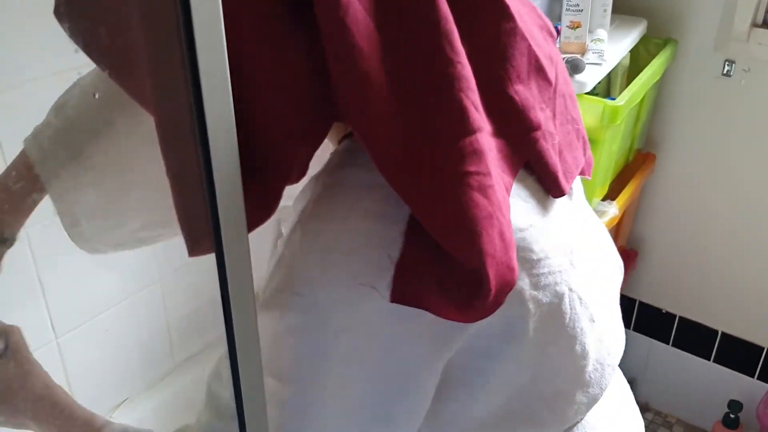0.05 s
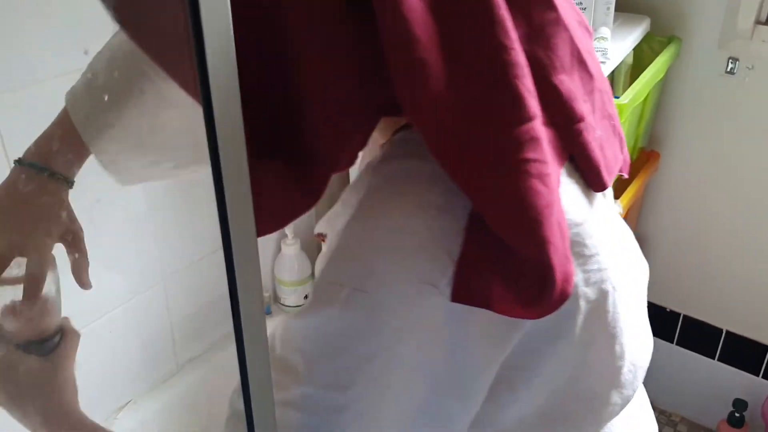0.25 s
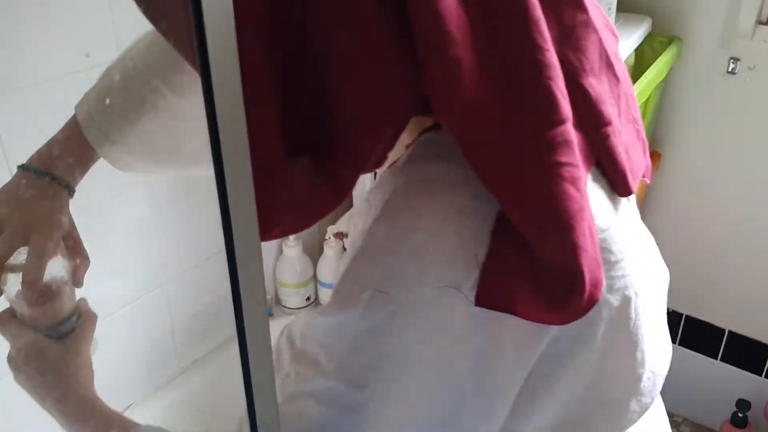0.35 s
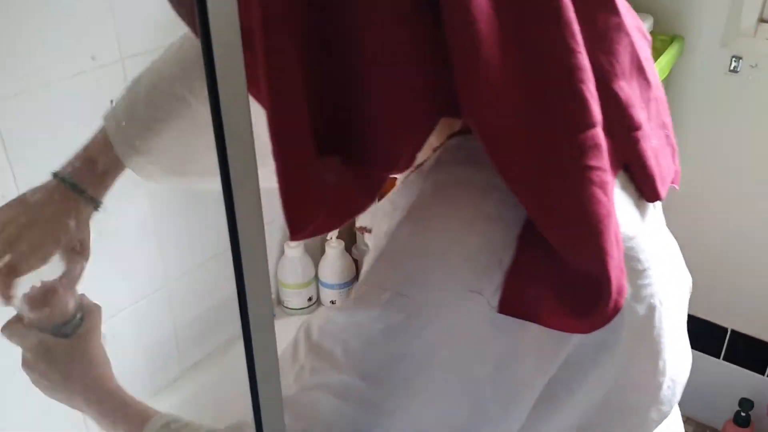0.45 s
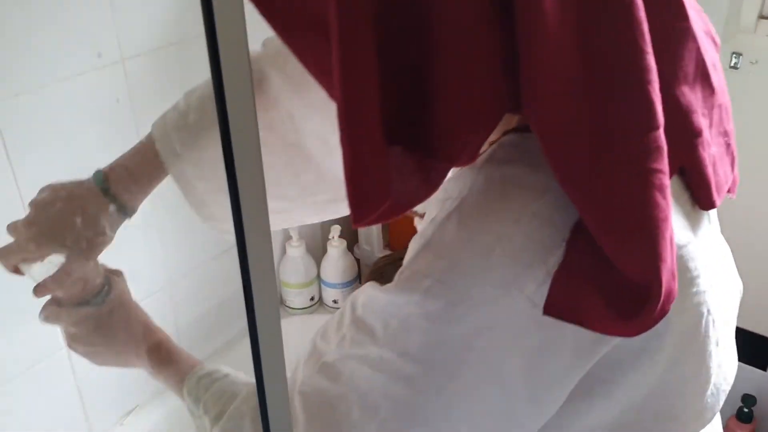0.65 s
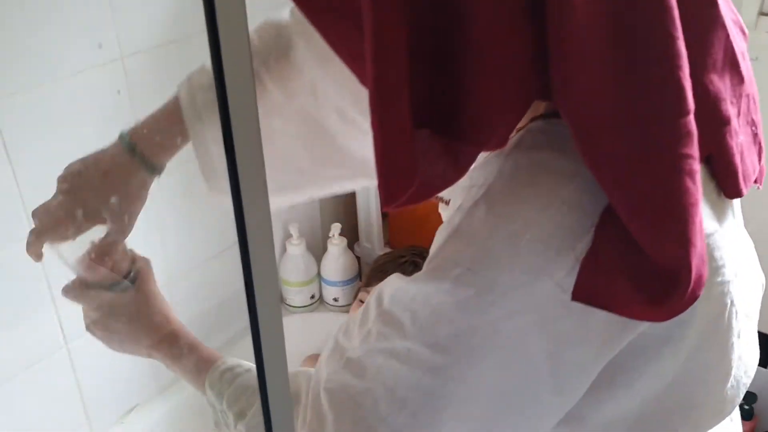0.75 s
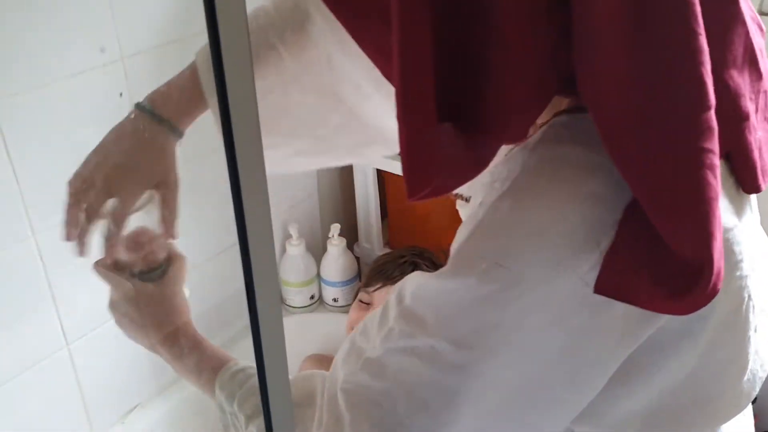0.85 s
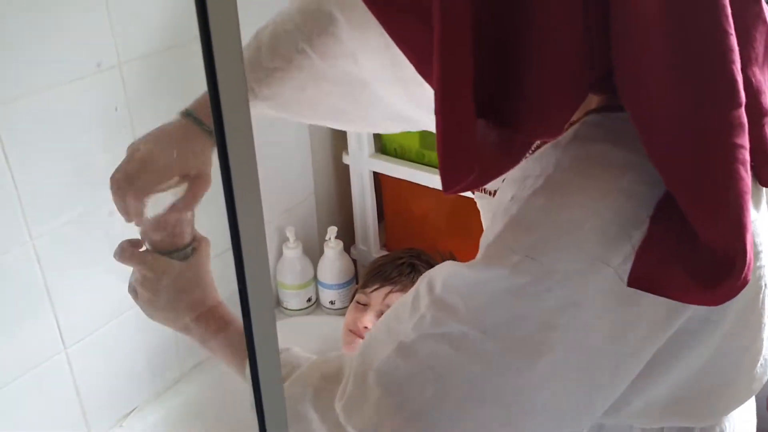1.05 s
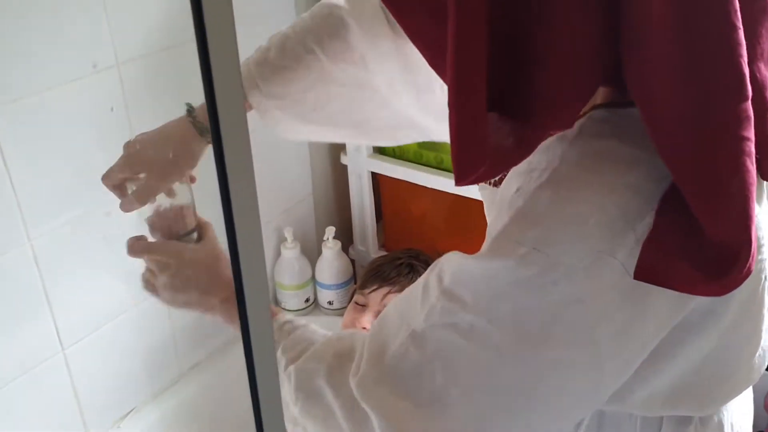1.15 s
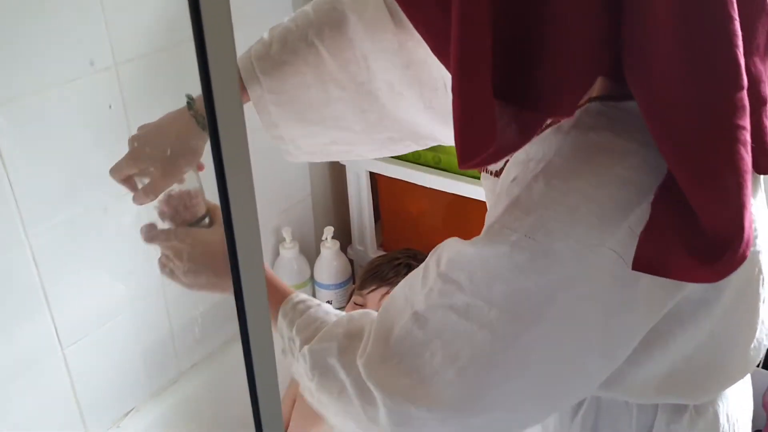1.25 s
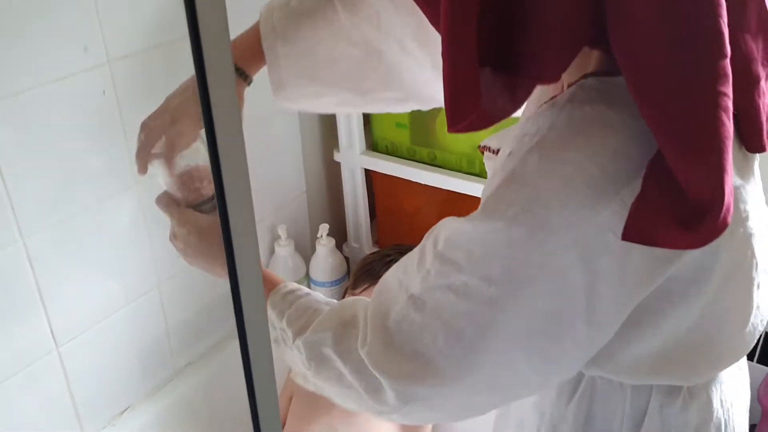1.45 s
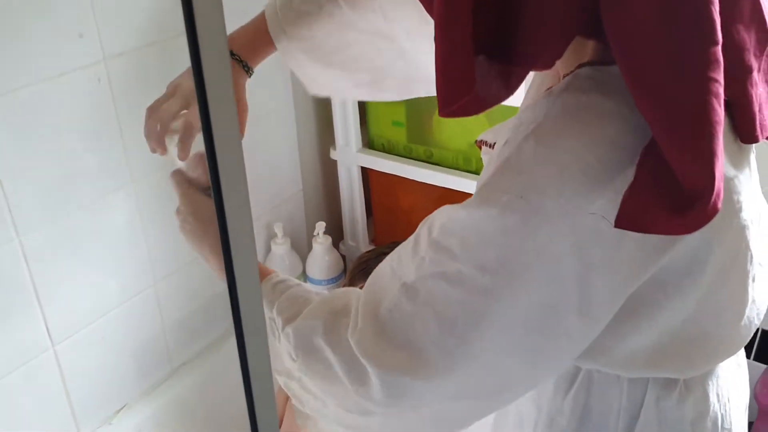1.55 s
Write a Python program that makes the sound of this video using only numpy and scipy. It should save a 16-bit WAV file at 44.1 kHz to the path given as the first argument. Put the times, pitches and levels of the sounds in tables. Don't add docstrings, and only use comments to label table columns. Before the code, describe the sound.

Two quick rattly swishes of salt sliding inside a small container, soft thuds and a knock between

```python
import sys
import numpy as np
from scipy import signal
from scipy.fft import rfft, irfft
from scipy.io import wavfile
from scipy.ndimage import uniform_filter1d

SR = 44100
rng = np.random.default_rng(int(sys.argv[2]) if len(sys.argv) > 2 else 0)


def master(y):
    cut = np.clip(np.atleast_2d(y).T, -1, 1)
    pcm = np.round(cut * 32767)
    wavfile.write(sys.argv[1], SR, pcm.astype(np.int16))


def undo_db(level):
    steps = np.asarray(level, float) / 20
    return 10 ** steps


N = 70560


def evened(x):
    return x / np.sqrt(np.mean(x ** 2) + 1e-20)


def read(points, hz):
    f, value = np.transpose(points)
    return np.interp(np.log(hz + 1), np.log(f + 1), value)


def level(points):
    return undo_db(np.interp(np.arange(N) / SR, *np.transpose(points)[:2]))


def add(mix, s, sound):
    part = mix[round(s * SR):][:len(sound)]
    part += sound[:len(part)]


def resonate(x, hz, width):
    turn = np.exp(2j * np.pi * np.cumsum(hz * np.ones(N)) / SR)
    r = np.exp(-np.pi * width / SR)
    return 2 * (turn * signal.lfilter([1 - r], [1, -r], x / turn + 1e-18)).real


def narrow_noise(noise, hz, width):
    return evened(resonate(resonate(noise, hz, width), hz, width))


def colour(x, points):
    return irfft(rfft(x) * undo_db(read(points, np.fft.rfftfreq(N, 1 / SR))), N)


# (frequency [Hz], coherence [0 to 1])
COHERENCE = [(60, 0.88), (300, 0.76), (1000, 0.016)]


def hiss(points, patchy_db):
    frames, hz = N // 256 + 5, np.fft.rfftfreq(1024, 1 / SR)
    a, b, c, d, patches = rng.standard_normal((frames, 513, 5)).T
    patches = uniform_filter1d(patches, size=14, axis=0)
    patches = evened(uniform_filter1d(patches, size=12, axis=1))
    same = np.clip(read(COHERENCE, hz), -1, 1)[:, None]
    left, other = a + 1j * b, c + 1j * d
    z = np.array([left, same * left + np.sqrt(1 - same ** 2) * other])
    z = z * undo_db(read(points, hz)[:, None] + patchy_db * patches)
    return evened(signal.istft(z, nperseg=1024, noverlap=768)[1][:, :N])


# (frequency [Hz], density [dB per Hz])
AIR = [(300, -11), (600, 7.5), (1500, 4.5), (3000, 3.5), (6500, 9.5), (8000, -3.5), (12000, -8),
       (15500, -1)]
# (frequency [Hz], density [dB per Hz])
CLOTH = [(450, -6), (750, -2), (1000, -3.5), (1500, -5.5), (2600, 1.5), (4000, -3.5), (6500, -7),
         (9700, -20.5), (12500, -24)]
# (time [s], level [dB])
RUSTLE = [(0, -59), (.1, -71.5), (.25, -82), (.265, -69), (.31, -72), (.38, -91), (.6, -59.5), (.8, -72.5),
          (.9, -79.5), (1.05, -101), (1.3, -66.5), (1.4, -67), (1.55, -67.5), (1.6, -64)]
# (frequency [Hz], density [dB per Hz])
SILK_COLOUR = [(5000, -15), (7000, 16), (12500, 9.5), (15600, -22)]
# (time [s], level [dB])
SILK = [(0, -80), (.1, -87.5), (1.33, -90.5), (1.4, -73.5), (1.6, -72.5)]
# (time [s], level [dB])
PIPE_MOAN = [(0, -62.5), (.2, -71), (.26, -89), (1.2, -86), (1.3, -66.5), (1.38, -82)]
# (frequency [Hz], density [dB per Hz])
RUMBLE = [(15, -33), (30, 5.5), (100, 4.5), (250, 0), (420, -14), (600, -14), (1000, -36.5)]
# (time [s], level [dB])
HANDLING = [(0, -73.5), (.1, -67.5), (.19, -68.5), (.26, -56), (.45, -65), (.6, -61), (.75, -60),
            (.85, -67.5), (.97, -71), (1.1, -66.5), (1.19, -65), (1.26, -68), (1.4, -68), (1.47, -75),
            (1.6, -73)]


def background():
    air = undo_db(-75.5) * hiss(AIR, patchy_db=1.2)
    cloth = level(RUSTLE) * hiss(CLOTH, patchy_db=1.2)
    silk = level(SILK) * hiss(SILK_COLOUR, patchy_db=1.2)
    rumble = level(HANDLING) * hiss(RUMBLE, patchy_db=1.0)
    noise = rng.standard_normal(N) + 0.52 * rng.standard_normal((2, N))
    moan = level(PIPE_MOAN) * narrow_noise(noise, hz=399.5, width=86)
    return air + cloth + silk + rumble + moan


# (start [s], rise [s], fall [s], level [dB], pitch [Hz])
THUDS = [(0.222, 0.024, 0.13, -38.5, 58), (0.275, 0.013, 0.048, -43.5, 65.5),
         (0.325, 0.012, 0.14, -57, 58.7), (0.44, 0.012, 0.19, -58, 42), (0.46, 0.05, 0.14, -57.5, 35.6),
         (0.29, 0.023, 0.19, -54.5, 36.6), (0.23, 0.014, 0.065, -56.5, 255), (0.27, 0.02, .04, -61.5, 410),
         (.25, 0.0097, 0.029, -61.5, 505), (.25, 0.015, 0.036, -55.5, 177), (0.28, 0.012, 0.023, -63, 244),
         (0.46, 0.013, 0.03, -65.5, 238), (1.09, 0.037, 0.14, -57, 65), (.855, 0.014, 0.043, -63.5, 270),
         (.43, 0.022, 0.092, -58.5, 98), (.626, 0.0018, 0.028, -49.5, 186), (1.13, 0.014, 0.084, -62, 180),
         (.55, 0.012, 0.047, -62, 310), (.341, .02, .12, -55, 61), (.626, 0.0035, 0.026, -48, 370.7),
         (0.64, 0.013, 0.13, -48, 60), (0.646, 0.014, 0.027, -43.5, 157), (0.67, 0.0067, 0.039, -49.5, 409),
         (.739, 0.0045, 0.023, -49, 304), (0.858, 0.013, 0.036, -56.5, 82), (0.993, 0.032, 0.1, -51.5, 67),
         (1.14, 0.006, 0.11, -57, 388), (1.125, 0.017, 0.032, -49, 287), (1.148, 0.014, 0.02, -38, 291),
         (1.175, 0.012, 0.024, -46, 290), (1.148, 0.0082, 0.14, -58.5, 96), (1.217, 0.01, 0.053, -59, 308)]


def thuds():
    out = np.zeros(N)
    for start, rise, fall, db, hz in THUDS:
        t = np.arange(0, rise + fall, 1 / SR)
        ramp = np.clip(np.minimum(t / rise, (rise + fall - t) / fall), 0, 1)
        shape = np.sin(np.pi / 2 * ramp) ** 2
        add(out, start, -undo_db(db) * shape * np.sin(2 * np.pi * hz * t))
    return out * undo_db([[1.2], [-1.2]])


# (frequency [Hz], decay time T60 [s])
ROOM = [(200, 0.25), (1000, 0.29), (3000, 0.21), (8000, 0.18), (15000, 0.1)]


def room(x):
    taps = np.zeros((2, SR // 2))
    at = np.arange(100, SR // 2 - 10, 10) + rng.integers(0, 10, (2, (SR // 2 - 101) // 10))
    np.put_along_axis(taps, at, rng.choice([-1., 1.], at.shape), 1)
    hz, t, z = signal.stft(taps, SR, nperseg=256)
    t60 = np.maximum(read(ROOM, hz), .03)[:, None]
    tail = signal.istft(z * undo_db(-60 * t / t60), SR, nperseg=256)[1]
    return signal.fftconvolve(x, tail / np.linalg.norm(tail[0]), axes=1)[:, :N]


# (time [s], level [dB], brightness [dB])
KNOCKS = [(.238, -53, -14.5), (0.26, -47.5, -5), (.628, -35.5, -2), (.641, -46.5, -0.5), (.655, -74, 1),
          (.666, -48.5, -28), (.68, -56, -25), (0.695, -55, -10), (0.712, -52, -33), (0.74, -54, 6),
          (0.752, -62, -29), (0.769, -57.5, -36), (.79, -55.5, -26)]
# (frequency [Hz], level [dB], decay time T60 [s])
TUB = [(76, 1.5, 0.054), (154, -5, 0.018), (232, -18, 0.043), (309.6, 5, 0.042), (363.7, 6, 0.054),
       (404.6, -12, 0.09)]
# (frequency [Hz], density [dB per Hz])
RIM = [(80, -28), (200, 6), (450, -3), (600, 0.5), (1400, -5.5), (2000, -12), (2700, -14), (3500, -39)]


def knocks():
    rim_t60_s = 0.12
    crack_db, crack_s = 2.5, 0.0029
    mode_scatter = .03
    out, puff, t = np.zeros(N), np.zeros(N), np.arange(8000) / SR
    spread = rng.standard_normal((len(KNOCKS), 14))
    for (s, db, bright_db), vary in zip(KNOCKS, spread):
        ring = 0
        for (hz, mode_db, t60), v, w in zip(TUB, vary, vary[7:]):
            decay = undo_db(mode_db + 2 * v - 60 * t / t60)
            ring = ring + decay * np.sin(2 * np.pi * hz * (1 + mode_scatter * w) * t)
        add(out, s, undo_db(db - 5.5) * np.minimum(t / 0.0036, 1) * ring)
        scrape_db = db + bright_db - 7 - 60 * t / rim_t60_s + crack_db * np.exp(-t / crack_s)
        add(puff, s, undo_db(scrape_db) * np.minimum(t / 0.00096, 1))
    friction = rng.standard_normal(N) + .8 * rng.standard_normal((2, N))
    both = out + puff * evened(colour(friction, RIM))
    return both + undo_db(-4) * room(both)


# (start [s], length [s], level [dB], upper whine [dB])
LENS = [(.275, .095, -81, -7), (.78, .09, -84, -12), (.94, .085, -79, -5), (1.5, .1, -83, -15)]


def lens():
    t, out = np.arange(N) / SR, np.zeros((2, N))
    noise = rng.standard_normal((2, N))
    whine = narrow_noise(noise, hz=9780, width=330)
    upper = narrow_noise(noise, hz=13770, width=330)
    motor_hiss = undo_db(5) * evened(resonate(noise[::-1], 7500, 3400))
    for start, length, db, upper_db in LENS:
        gate = np.clip(np.minimum((t - start) / 0.0047, (start + length - t) / 0.034), 0, 1)
        out += undo_db(db) * gate * (whine + motor_hiss + undo_db(upper_db) * upper)
    return out


# (time [s], surge [dB])
LUMPS = [(0.409, 2), (.434, 1), (0.446, 6.5), (.458, 7), (0.472, -4), (.479, 3.5), (0.486, 6.5),
         (0.499, -4), (0.502, 5), (0.509, 5.5), (.514, 4), (0.531, 12), (0.543, 8), (0.554, 7),
         (1.036, 0.5), (1.048, 3), (1.056, 11), (1.068, 2), (1.090, 6.5), (1.095, 7), (1.104, 10),
         (1.109, 4.5), (1.117, 11.5), (1.129, 5), (1.133, 2), (1.146, 3.5), (1.156, 15), (1.163, 6.5),
         (1.171, -3)]


def lumps():
    rise_s, fall_s = 0.00083, 0.0031
    surge_db, t = np.zeros(N), np.arange(1500) / SR
    for s, db in LUMPS:
        add(surge_db, s, db * np.minimum(t / rise_s, 1) * np.exp(-t / fall_s))
    return undo_db(surge_db)


def grains():
    grains_per_s, spread_db = 12000, 2.5
    clump_db, clump_s = .6, 0.0093
    clumps = evened(uniform_filter1d(rng.standard_normal(N), round(clump_s * SR)))
    struck = rng.random((2, N)) < grains_per_s / SR
    sign = np.sign(rng.standard_normal((2, N)))
    size = np.minimum(rng.exponential(1, (2, N)), 5)
    return struck * sign * undo_db(spread_db * size + clump_db * clumps)


# (frequency [Hz], width [Hz], level [dB])
SHELL = [(2110, 36, -11), (2395, 90, -16), (2549, 12, -6.5), (2780, 48, -12), (2937, 8.7, -5)]


def container(ticks, cavity_hz):
    extra_width_hz = 30
    cavity = undo_db(13) * 2 * resonate(ticks, cavity_hz, width=210)
    wall = undo_db(8) * 2 * resonate(ticks, 2095, width=180)
    rung = evened(ticks + cavity + wall)
    for hz, width, db in SHELL:
        rung = rung + undo_db(db) * evened(resonate(ticks, hz, extra_width_hz + width))
    return rung


# (time [s], level [dB], cavity pitch [Hz])
SHAKES = [
    [(.385, -100, 2730), (.409, -57, 2600), (.432, -47, 2750), (.45, -40.5, 2470), (.466, -42.5, 2450),
     (.48, -38.5, 2780), (.515, -38.5, 2670), (.565, -53, 3200), (.62, -65.5, 3500)],
    [(1.012, -101, 2290), (1.033, -53.5, 2470), (1.06, -51.5, 2680), (1.09, -44, 2800), (1.112, -41, 2700),
     (1.15, -42.5, 2930), (1.172, -57, 3040), (1.21, -60.5, 2920), (1.255, -72, 2940)],
]
# (frequency [Hz], density [dB per Hz])
SALT = [(700, -75), (1050, -14), (1550, -9.5), (2300, -13), (2900, -12.5), (3500, -10.5), (5000, -16.5),
        (7000, -28.5), (9000, -37)]
# (frequency [Hz], density [dB per Hz])
FIZZ = [(3000, -8.5), (5000, -1.5), (8600, -8.5), (10500, -11), (12000, -9.5), (14000, -17.5), (15600, -20)]
# (frequency [Hz], density [dB per Hz])
SLUMP = [(150, -18), (300, 1.5), (500, -7), (900, 6.5), (1300, 9), (2500, -30)]
# (frequency [Hz], left over right [dB])
SALT_BALANCE = [(400, 0), (1000, -2), (1500, -3.5), (2800, -2.7), (5000, 3), (9000, -3), (15000, -2)]
# (time [s], left over right [dB])
SWING = [(.41, -1.5), (.52, 2.5), (1.02, -2.5), (1.16, 1.5)]


def salt():
    loud = undo_db(-34)
    fizz_lag_s = .008
    rows = []
    for s in SHAKES:
        rows += [(s[0][0] - .01, -130, s[0][2]), *s, (s[-1][0] + 0.031, -130, s[-1][2])]
    rows = np.array(rows)
    cavity_hz = np.interp(np.arange(N) / SR, rows[:, 0], rows[:, 2])
    push = level(rows)
    effort = push * lumps()
    ticks = grains()

    near = effort * evened(colour(container(ticks, cavity_hz), SALT))
    keep = np.exp(-1 / (fizz_lag_s * SR))
    late = signal.lfilter([1 - keep], [1, -keep], effort)
    near += undo_db(-51) * (late / loud) ** 0.58 * evened(colour(ticks, FIZZ))
    mass = ticks[0] + .5 * ticks
    near += undo_db(-41.5) * (push / loud) ** 3.02 * evened(colour(mass, SLUMP))

    both = undo_db(2) * near + room(near)
    side = read(SALT_BALANCE, np.fft.rfftfreq(N, 1 / SR)) / 2
    swing = np.interp(np.arange(N) / SR, *np.transpose(SWING)) / 2
    return irfft(rfft(both) * undo_db([side, -side]), N) * undo_db([swing, -swing])


def scene():
    return background() + thuds() + knocks() + lens() + salt()


def band_limit(x):
    return signal.sosfilt(signal.butter(12, 15630, fs=SR, output="sos"), x)


# (frequency [Hz], gain [dB])
MIC = [(6800, 0.12), (7200, -4), (8000, -3), (8800, 3)]
# (frequency [Hz], gain [dB])
EDGE = [(15640, 0), (15720, -80)]


def record(dry):
    return band_limit(colour(dry, [*MIC, *EDGE]))


dry = scene()
out = record(dry)
master(out)
```